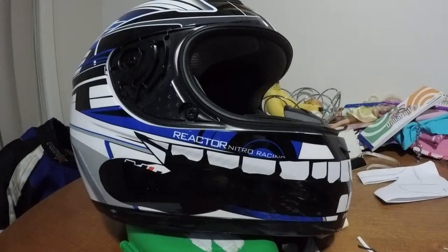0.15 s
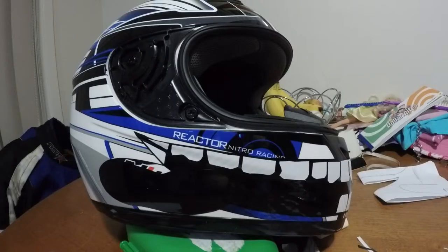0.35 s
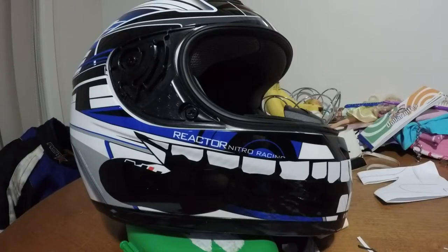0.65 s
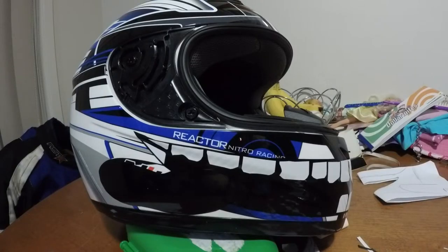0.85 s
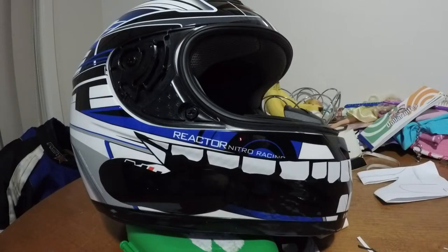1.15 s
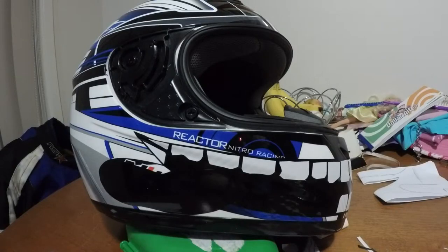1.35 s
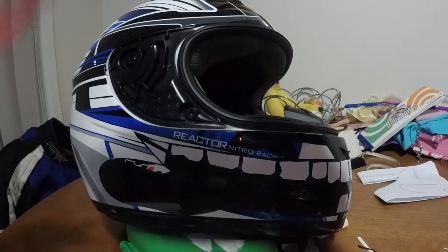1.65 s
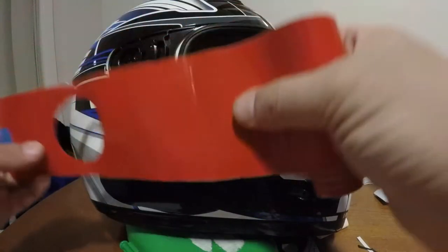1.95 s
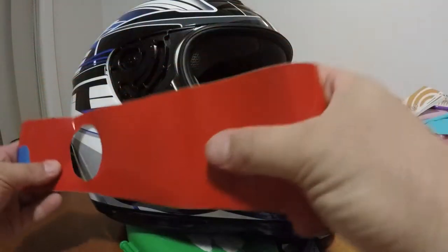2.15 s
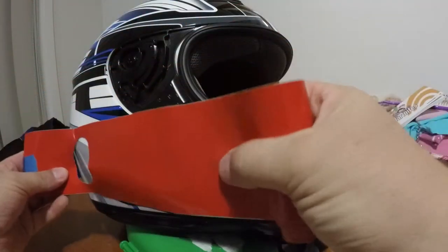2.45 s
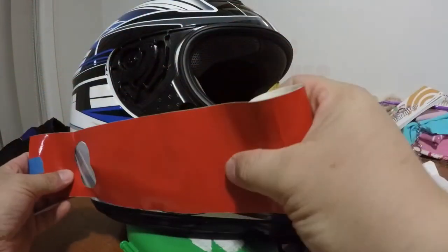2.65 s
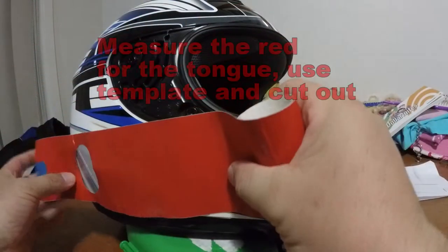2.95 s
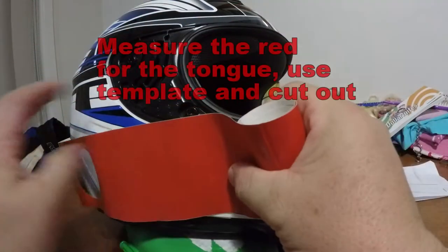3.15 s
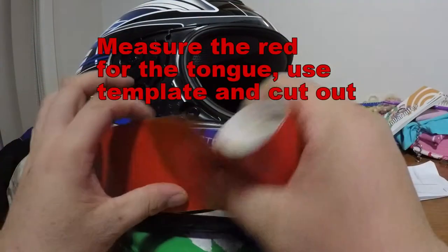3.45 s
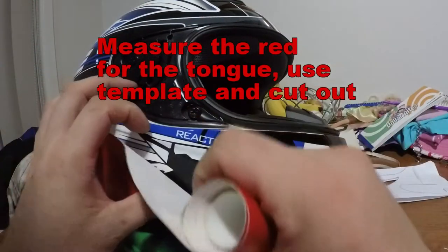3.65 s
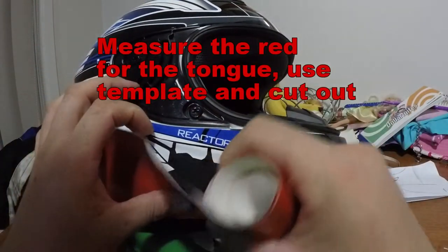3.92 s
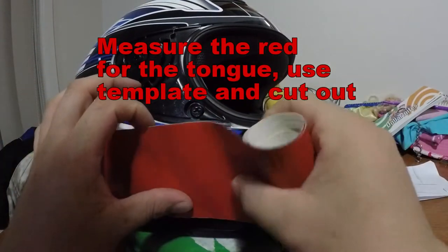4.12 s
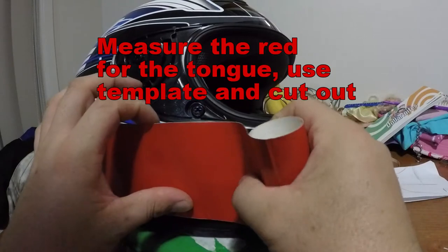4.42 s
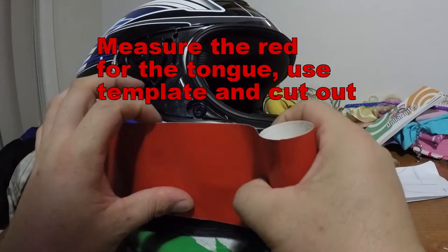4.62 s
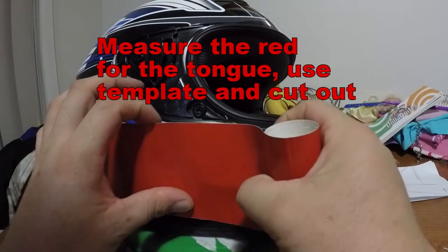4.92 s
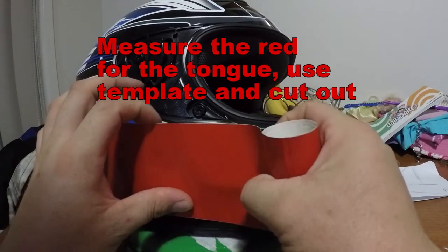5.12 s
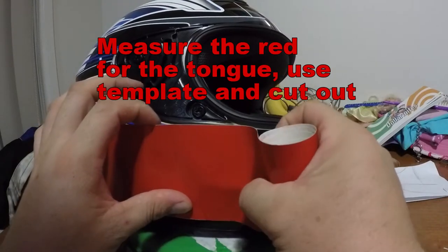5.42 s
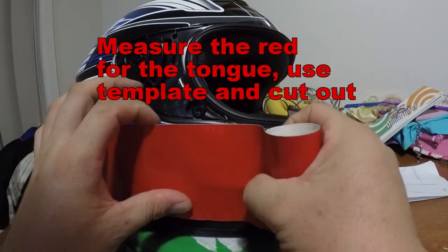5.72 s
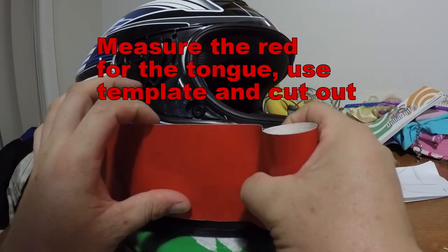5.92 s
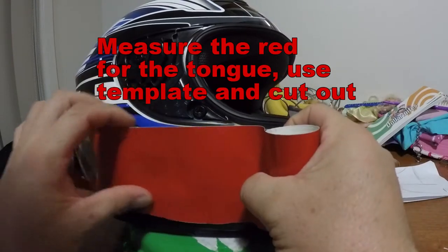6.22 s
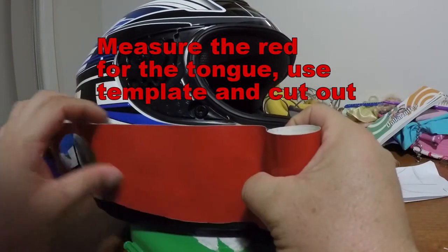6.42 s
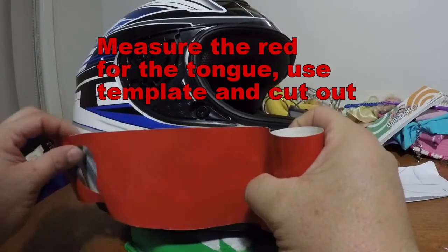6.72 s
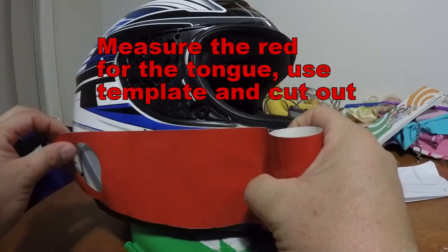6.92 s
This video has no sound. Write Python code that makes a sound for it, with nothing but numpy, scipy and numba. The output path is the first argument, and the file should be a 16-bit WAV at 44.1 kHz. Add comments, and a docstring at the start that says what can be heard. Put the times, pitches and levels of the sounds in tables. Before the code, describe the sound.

After a tiny silence, a quiet small room opens with low motor hum, slowly beating, plus soft hiss and lumpy rumble. Up to 0.5 s, film rubs dryly with small crinkles and a dull bump. A near pause follows until about 1.2 s, when light taps and scratchy strokes resume. From 1.65 to 2.6 s, creases snap over soft thuds, with a brighter pop near 2.35. Around 2.95-3.4 s comes a denser cluster of sharp crackles, rubs and hollow bumps. At 3.65 s one hard hollow knock is by far the loudest event, followed by a rapid papery flutter of about a tenth of a second. Then it is sparse, with soft bumps at 4.45. Crisp snaps come at 5.58 and 6.0; faint squeaky rubbing leads to a strong double snap at 6.6, then small crinkles and rubs fade toward 7 s. Close microphone, short dull room tail.

```python
"""In a small furnished room, two hands unroll a strip of adhesive vinyl and press it against a helmet.
Skin and film rub in short strokes made of random slips, and creases snap as brief filtered bursts.
The roll bumps the shell with soft pushes that ring its modes, and knocks it hard once.
Three motors elsewhere in the house hum as sums of cosines at nearly the same speed and beat slowly.
Shaped noise lays a hiss and a lumpy rumble underneath."""
import sys
import numpy as np
from scipy import signal
from scipy.fft import rfft, irfft
from scipy.io import wavfile
from scipy.ndimage import uniform_filter1d
from numba import njit

SR = 44100
rng = np.random.default_rng(int(sys.argv[2]) if len(sys.argv) > 2 else 0)


def materialize(psi):
    """Save the field psi as 16-bit PCM at rate SR to the path in sys.argv[1].

    A 1-D psi becomes a single channel; in a 2-D psi each row is a channel.
    """
    bounded = np.clip(np.atleast_2d(psi).T, -1, 1)
    quanta = np.round(bounded * 32767).astype(np.int16)
    wavfile.write(sys.argv[1], SR, quanta)


N = 311787
T = np.arange(N) / SR

# spectrum of the hiss: pitch_hz, relative level_db
HISS_SPECTRUM = [(22, 21), (32, 25), (45, 18.5), (70, 13), (120, 8.5), (200, 3), (350, -2), (550, -13.5),
                 (750, -22), (1400, -26), (2600, -21), (4500, -18), (7500, -21.5), (15000, -25)]
HISS_DB = -52  # rms
# narrow bands in the hiss: centre_hz, width_hz, rms_db
WHISTLES = [(2620, 45, -82), (5930, 66, -78.5)]
# mains hum: pitch_hz, rms_db
MAINS = (100.03, -72)
# motors: speed_hz, crest_s (when a crest passes), [(multiple of the speed, rms_db before drift)]
MOTORS = [(48.848, .0056, [(1, -43.6), (2, -74)]), (51.453, .0141, [(1, -49.4)]),
          (49.254, .0113, [(1, -54.6), (3, -58.5), (7, -74), (10, -79), (38, -86), (39, -73.5), (44, -83)])]
# buzz of the first motor: multiple of its speed, rms_db before swells
BUZZ = [(3, -74), (4, -75), (8, -78), (9, -78), (11, -79), (12, -81), (14, -84), (17, -85), (19, -82),
        (21, -87), (24, -82), (25, -84), (27, -84), (28, -85), (29, -81), (30, -84), (31, -85), (32, -86),
        (41, -84), (42, -87), (45, -87), (46, -86), (48, -87), (49, -83), (51, -86), (53, -83), (54, -85),
        (55, -87)]
# upper whine of the third motor: time_s, 40th_multiple_rms_db, 41st_multiple_rms_db
WHINE = [(.3, -76, -84), (1.3, -79, -90), (2.3, -84, -75), (2.8, -84, -77), (3.1, -76, -76),
         (3.75, -69, -78), (4.1, -71, -75), (4.6, -78, -75), (7.07, -79, -77)]
# rumble of air and table: time_s, level_db, deep_part_db (before swells)
RUMBLE = [(0.1, -61.5, -66), (0.5, -63.5, -71), (1.1, -66.5, -79), (1.6, -65, -59), (2.3, -60.5, -57.5),
          (2.8, -66, -79), (3.4, -63, -58.5), (4.0, -63, -70), (4.8, -68.5, -64), (5.5, -64.5, -67),
          (6.1, -62.5, -64), (7.07, -67.5, -58)]
DEEP_SWELL_DB, DEEP_SWELLS_PER_S = 1.2, 3

# modes of the helmet shell: pitch_hz, width_hz, level_db
SHELL_MODES = [(334, 27, 5), (556, 100, -1), (779, 46, 0.5), (852, 14, 2.5), (1370, 28, -35)]
# roll and fingers bumping the shell: start_s, peak_db, pitch_hz, scuff_t60_s (at least 0.01 is used),
# upper_scuff_db and shell_ring_db (upper scuff against the bump, ring against the thud's body)
BUMPS = [(0.156, -56.5, 412, 0.13, 9, -3), (0.445, -42, 705, 0.25, -17, -1),
         (1.255, -44.5, 493, 0.07, -8, -5), (1.269, -43.5, 890, 0.05, -6, -5),
         (1.672, -42, 277, 0.055, -9, -4), (1.7223, -34.5, 1180, 0.019, -17, -12),
         (1.726, -36.5, 320, 0.046, -23, -8), (1.767, -47, 950, 0.03, -11, -10),
         (1.81, -52, 1150, 0.03, -15, -17), (1.828, -47, 1280, 0.03, -20, -20),
         (1.976, -50, 500, 0.03, -15, -10), (2.212, -49, 500, 0.03, -10, -10),
         (2.363, -53, 316, 0.059, -7, -3), (2.367, -43, 1200, 0.03, -12, -15),
         (2.571, -44.5, 202, 0.044, -25, -1), (2.989, -43.5, 890, 0.04, -25, 2),
         (3.005, -45, 253, 0.033, 1, -6), (3.006, -44, 800, 0.03, -15, -6),
         (3.1, -42.5, 265, 0.083, -2.5, -6), (3.279, -36, 495, 0.31, -20, -4),
         (3.287, -38, 630, 0.092, -23, -8), (3.295, -42, 520, 0.1, -22, -5),
         (3.308, -45, 350, 0.1, -15, -3), (3.545, -46, 1000, 0.02, -10, -15),
         (3.547, -35, 298, 0.03, -12, -7), (3.555, -46, 850, 0.03, -15, -12),
         (3.567, -47, 500, 0.03, -12, -10), (3.606, -40.5, 475, 0.03, -11, -12),
         (3.61, -44, 1010, 0.04, -20, -17), (3.612, -34, 295, 0.039, -20, -10),
         (3.654, -43, 830, 0.043, -15, -2), (4.44, -46, 400, 0.08, -3, -8),
         (4.453, -42, 270, 0.17, -9, -10), (4.465, -47.5, 330, 0.087, -7, -6),
         (5.579, -39, 293, 0.089, -10, -5), (6.008, -35.5, 290, 0.024, -16, -4),
         (6.082, -46, 520, 0.03, -20, -12), (6.085, -49, 1000, 0.03, -20, -16),
         (6.092, -40.5, 272, 0.097, -30, -7), (6.132, -50, 280, 0.04, -20, -8),
         (6.426, -42, 900, 0.03, -5, 1), (6.436, -54, 880, 0.04, -20, -5),
         (6.604, -41, 300, 0.069, -12, -3), (6.654, -44.5, 242, 0.064, -4, -3),
         (6.893, -53.5, 300, 0.05, 5, -3), (6.904, -54.5, 250, 0.06, 2, -6)]
# the roll hits the shell hard once: peak_db, centre_hz, shell_ring_db, crack_db (both against the peak)
KNOCK = (-16.5, 1419, -6, -11.5)
KNOCK_S = 3.6445
# resonances of the hollow roll: pitch_hz, base width_hz (widened in use), level_db
ROLL_MODES = [(2390, 220, 5), (2900, 360, 1), (3400, 260, 0), (4190, 530, 1), (5100, 610, -4)]

# creases snapping: start_s, peak_db, centre_hz, body_db, airy_db (both against the peak)
SNAPS = [(0.157, -37.5, 2400, -8, -10), (0.225, -42, 4000, -20, -15), (0.255, -44, 2600, -1.5, -15),
         (1.219, -39, 3630, -8, -22), (1.477, -38, 3200, -9.5, -3), (1.494, -42, 5100, -7, -21),
         (1.6701, -32, 4300, -6, -27), (1.6726, -32, 3640, -9, 0.5), (2.007, -47, 3800, -20, -20),
         (2.031, -36.5, 4350, -14, -28), (2.0757, -47, 3200, 1.5, -20), (2.081, -42, 2600, -9, -7),
         (2.1743, -32.5, 3420, -11, -11), (2.211, -43, 3000, -7, -18), (2.242, -43, 4200, -8, -20),
         (2.356, -28.5, 3700, -12, -12), (2.4305, -38, 2300, -3, -25), (2.575, -45, 3130, -19, -27),
         (2.9539, -30, 5500, -14, -15), (2.9575, -38, 6100, -14, -20), (2.9916, -40, 5600, -19, -1),
         (3.004, -31, 4170, -13, -25), (3.006, -36, 2420, -20, -30), (3.068, -39.5, 3600, -11, -18),
         (3.085, -38, 2970, -26, -29), (3.103, -25.5, 4400, -32, -17), (3.108, -36, 3470, -11, -36),
         (3.114, -34.5, 3300, -26, -29), (3.172, -46, 5200, -25, -20), (3.2782, -38, 2300, -20, -22),
         (3.3514, -39, 3500, -21, -28), (3.367, -41, 3200, -24, -31), (3.468, -47, 3700, -25, -28),
         (3.513, -41.5, 2900, -8, -25), (3.5454, -58, 2280, 16.5, -25), (3.654, -38, 3050, 4, -50),
         (3.663, -41, 2200, -5, -40), (3.95, -48, 5300, -27, -19), (3.995, -49, 3600, -18, -20),
         (4.138, -47, 3330, -18, -24), (4.41, -39.5, 2600, -5, -39), (4.569, -47.5, 2410, -6, 2),
         (5.5554, -42, 3330, -9, -19), (5.5806, -24.5, 4140, -11.5, -13), (5.792, -39.5, 3370, -9, -30),
         (6.0057, -25, 3220, -9.5, -21), (6.1917, -42, 2820, -11, -24), (6.253, -46, 2900, -9, -28),
         (6.567, -47, 2500, -8, -10), (6.581, -43, 2600, -8, -8), (6.6033, -28, 3230, -11, -32),
         (6.6067, -21, 3080, -16, -7), (6.655, -46, 3200, -6, -24), (6.672, -43, 3400, -15, -10),
         (6.743, -45, 3300, -2, -10), (6.757, -43, 3000, -19, -29), (6.905, -39.5, 2260, -14, -23)]
# rings of a crease: share of its centre pitch, level_db
CREASE_RINGS = [(.6, -25), (.85, 6.5), (1.16, -14), (1.55, -12)]
CREASE_BODY_HZ = 1390
CRACKLE_DB = -24  # rms before its fade and the crease filters
# resonances of the loose end flapping against the shell: pitch_hz, width_hz, level_db
LOOSE_END = [(830, 120, -3), (990, 160, 2), (1300, 250, -6), (1530, 200, -1), (1950, 110, -6),
             (2560, 150, -9), (3300, 180, -16), (4190, 250, -16)]
FLAP_S, FLAP_PERIOD_S = 3.6755, .0204
FLAP_DB, FLAP_FADE_DB = -24, 0.6  # peak of the first slap before the resonances, drop per flap
RATTLE_DB, RATTLE_END_S = -32, 0.15  # loose film before the resonances; its end after the knock

# skin and film creeping: time_s, level_db, centre_hz, dull_part_db, airy_db (against the level)
CREEP = [(0.1, -77, 3180, -59, -13), (0.24, -60, 3550, -64.5, -1), (0.42, -79, 3420, -65, -19),
         (0.69, -69.5, 3820, -65.5, 0.5), (1.1, -81, 3000, -69, -8), (1.26, -69.5, 4100, -60, 0),
         (1.7, -71, 3870, -65.5, 3.5), (1.82, -65, 3600, -58, 1), (2.0, -69, 3700, -65.5, 2),
         (2.25, -65.5, 3230, -61, -1), (2.75, -72.5, 3160, -68, -6), (3.0, -63, 3560, -62, 0),
         (3.2, -76, 3150, -68, -8), (3.32, -61.5, 2980, -65.5, -6), (3.6, -81, 2900, -66, -18),
         (4.43, -70.5, 3530, -67, -5), (5.0, -87, 3080, -67, -10), (5.2, -68, 3000, -67, -4),
         (5.9, -84, 3400, -67, -13), (6.2, -61, 3340, -70, -8), (6.46, -64.5, 4600, -64, -5),
         (6.57, -63.5, 3040, -62, 0.5), (6.85, -63, 2860, -63.5, -6), (7.07, -75, 3050, -68, -8)]
TICKS_PER_S, TICK_DB = 45, -15  # small creases, against the creep level
# strokes: start_s, end_s, level_db, change_to_end_db, centre_hz, airy_db, squeak_db (both against the level)
STROKES = [(0.047, 0.166, -65, 5, 3670, 2, -31), (0.151, 0.207, -59, -1, 2970, -10, 3.5),
           (0.151, 0.268, -57, -6, 3860, -0.5, -11), (1.223, 1.406, -60, 1, 4300, -2, -23),
           (1.478, 1.55, -61.5, -9, 4930, 11, -23), (1.486, 1.512, -61, 0, 5470, -20, 3),
           (1.589, 1.626, -61, 0, 4030, 3, -28), (1.657, 1.703, -59, -4, 4500, -1, -15),
           (1.738, 1.762, -61, -0.5, 5400, -9, -5), (2.054, 2.096, -60, 1, 3940, -4, -24),
           (2.277, 2.328, -62, -1, 2900, -15, -17), (2.365, 2.428, -64, 2, 3900, -12, -15),
           (2.462, 2.583, -56, -3.5, 2900, -20, -9), (2.937, 2.957, -59, 0, 6000, -10, -15),
           (2.949, 2.965, -55, -2, 3400, -8, 1), (2.987, 3, -53, 0, 5200, -12, -2),
           (3.006, 3.021, -52.5, -2, 3450, -20, 0), (3.029, 3.048, -65, -3, 3400, -20, 6),
           (3.275, 3.357, -55.5, -12, 3100, -16, -6), (3.362, 3.39, -60.5, -9, 2900, -22, 4),
           (3.435, 3.483, -69.5, 5, 2930, -22, -1.5), (3.943, 3.963, -64, 8.5, 5330, -15, -3),
           (4.13, 4.244, -68, -4, 2960, -14, -11), (4.437, 4.469, -58.5, 1, 3120, -4.5, -21),
           (4.553, 4.638, -70, 6, 3700, -12, -18), (5.453, 5.56, -86, -11, 3830, -16, -20),
           (5.579, 5.632, -54, -19, 5000, 3, -17), (6.198, 6.254, -61, -5, 4360, -8, -20),
           (6.248, 6.37, -67.5, -2, 2900, -19, 6), (6.377, 6.476, -70, 4, 5960, -20, -5),
           (6.471, 6.53, -64.5, 6, 5100, -20, -2), (6.529, 6.535, -54, 0, 4030, -25, 14),
           (6.609, 6.645, -56, -9, 4000, -6, -15), (6.644, 6.68, -51, 0, 2900, -7, -8),
           (6.668, 6.69, -57, -2, 2460, -3, 1), (6.673, 6.698, -63.5, -3, 6000, -20, 3),
           (6.813, 6.852, -59.5, -5, 3140, -18, -10), (6.875, 6.924, -58.5, -5, 3400, -5, -20)]
STROKE_EDGE_S = 0.006

ROOM_T60_S, ROOM_DB, ROOM_WIDTH_HZ = 0.33, -18.5, 3700
START_S, TOP_HZ = .052, 15600


def undb(db):
    """Decibels to an amplitude factor."""
    return 10 ** (np.asarray(db) / 20)


def level(x, db):
    """Sets the rms level."""
    return x * undb(db) / np.sqrt(np.mean(x ** 2))


def peak(x, db):
    """Sets the peak level."""
    return x * undb(db) / np.max(np.abs(x))


def tone(turns):
    """Cosine of unit rms, its phase counted in turns."""
    return np.sqrt(2) * np.cos(2 * np.pi * turns)


@njit
def svf(x, hz, width):
    """State-variable band-pass whose centre and width may move; gain 1 at the centre."""
    y, b, l = np.empty(len(x)), 0., 0.
    for i in range(len(x)):
        g, k = np.tan(np.pi * hz[i] / SR), width[i] / hz[i]
        v = (b + g * (x[i] - l)) / (1 + g * (g + k))
        b, l, y[i] = 2 * v - b, l + 2 * g * v, k * v
    return y


def band(x, hz, width):
    """Band-pass with fixed or moving settings."""
    one = np.ones(len(x))
    return svf(x + 1e-18, np.clip(hz * one, 20, SR * .45), width * one)


def steep(x, hz, width):
    """The same band-pass twice, for steeper sides."""
    return band(band(x, hz, width), hz, width)


def walk(rate):
    """Random levels held 1 / rate s and slewed twice; spread near 1."""
    hold = int(SR / rate)
    steps = np.repeat(rng.standard_normal(N // hold + 1), hold)
    return 1.35 * uniform_filter1d(uniform_filter1d(steps, hold), hold)[:N]


def slips(size, rate, spread_db):
    """Stick-slip ticks at random moments, of random sign and size; spread_db scatters the sizes further."""
    ticks = rng.random(size) < rate / SR
    return ticks * rng.standard_normal(size) * undb(spread_db * rng.exponential(size=size))


def add(out, s, x):
    """Mixes x into out from time s."""
    i = int(s * SR)
    out[i:i + len(x)] += x[:N - i]


def hiss():
    """Smooth noise of house and microphone, with a few narrow flickering bands."""
    hz, db = np.transpose(HISS_SPECTRUM)
    f = np.maximum(np.arange(N // 2 + 1) * SR / N, 1)
    shape = undb(np.interp(np.log(f), np.log(hz), db)) * (f > 18)
    out = level(irfft(rfft(rng.standard_normal(N)) * shape, N), HISS_DB)
    for centre_hz, width, rms_db in WHISTLES:
        whistle = band(rng.standard_normal(N), centre_hz, width)
        out += level(whistle * undb(2.8 * walk(15)), rms_db)
    return out


def motors():
    """Each motor sounds multiples of its speed, drifting in level; close speeds beat over a mains hum."""
    mains_hz, mains_db = MAINS
    out = undb(mains_db) * tone(mains_hz * T)
    for hz, crest_s, multiples in MOTORS:
        for k, db in multiples:
            # even multiples lag a quarter cycle
            turns = k * hz * (T - crest_s) - (k % 2 == 0) / 4
            out += undb(db + .7 * walk(6)) * tone(turns)
    return out


def buzz():
    """High multiples of the first motor, unrelated in phase, each swelling slowly."""
    out = np.zeros(N)
    speed_hz = MOTORS[0][0]
    for k, db in BUZZ:
        swell_db = np.interp(T, np.arange(9), 2 * rng.standard_normal(9))  # a new target each second
        out += undb(db + swell_db) * tone(k * speed_hz * T + rng.random())
    return out


def whine():
    """Two neighbouring multiples of the third motor wax and wane; the lower lags a quarter cycle."""
    s, lower_db, upper_db = np.transpose(WHINE)
    speed_hz, crest_s, _ = MOTORS[2]
    turns = speed_hz * (T - crest_s)
    lower = undb(np.interp(T, s, lower_db)) * tone(40 * turns - 1 / 4)
    upper = undb(np.interp(T, s, upper_db)) * tone(41 * turns)
    return lower + upper


def rumble():
    """Low, lumpy noise of air and table; its deep part swells at random."""
    lumps = rng.standard_normal(N) * undb(2.0 * walk(25))
    s, db, deep_db = np.transpose(RUMBLE)
    deep_db = np.interp(T, s, deep_db) + DEEP_SWELL_DB * walk(DEEP_SWELLS_PER_S)
    low = undb(np.interp(T, s, db)) * level(steep(lumps, 180, 480), 0)
    return low + undb(deep_db) * level(steep(lumps, 57, 138), 0)


def room(x):
    """Near walls answer after a few milliseconds with a short, dull tail."""
    t = T[:SR // 2]
    decay = 1000 ** (-t / ROOM_T60_S) * (t > .008)
    tail = band(rng.standard_normal(len(t)), 620, ROOM_WIDTH_HZ) * decay
    return x + signal.fftconvolve(x, tail * undb(ROOM_DB) / np.sqrt(np.sum(tail ** 2)))[:N]


def shell(push):
    """The helmet shell rings with its modes."""
    return sum(undb(db) * band(push, hz, width) for hz, width, db in SHELL_MODES)


def bump(db, hz, t60, upper_db, shell_db):
    """A soft push, half a cycle long, thuds at its own pitch, scuffs and rings the shell."""
    t = T[:SR // 5]
    push = np.sin(2 * np.pi * hz * np.minimum(t, .5 / hz))
    scuff = 0.86 * rng.standard_normal(len(t)) * 1000 ** (-t / max(t60, .01))
    body = band(steep(push + 0.59 * scuff, hz, 0.7 * hz), hz, hz)
    thud = peak(body, 0) + peak(shell(push + scuff), shell_db)
    return peak(thud, db) + peak(steep(scuff, 530, 870), db + upper_db)


def knock():
    """The one hard hit swings a full cycle, rings the shell and cracks through the hollow roll."""
    t = T[:SR // 5]
    db, hz, shell_db, crack_db = KNOCK
    push = np.sin(2 * np.pi * hz * np.minimum(t, 1 / hz))
    body = steep(push, hz, 2600) + 0.82 * band(push, hz, 420)
    burst = rng.standard_normal(len(t)) * np.exp(-t / 0.0016)
    burst[0] += 6  # sharp first contact
    crack = np.zeros(len(t))
    for mode_hz, width, mode_db in ROLL_MODES:
        crack += undb(mode_db) * steep(steep(burst, mode_hz, 1.5 * width), mode_hz, 2.7 * width)
    return peak(body, db) + peak(shell(push), db + shell_db) + peak(crack, db + crack_db)


def bumps():
    """Places the soft bumps and the hard knock."""
    out = np.zeros(N)
    for s, *how in BUMPS:
        add(out, s, bump(*how))
    add(out, KNOCK_S, knock())
    return out


def snap(db, hz, body_db, airy_db):
    """A crease gives way within a millisecond or two, rings a few cycles and leaves a fading crackle."""
    t = T[:SR // 8]
    flip = level(slips(len(t), rate=3400, spread_db=0.5), CRACKLE_DB) * np.exp(-t / 0.0091)
    flip += 0.44 * rng.standard_normal(len(t)) * t / 0.00051 * np.exp(-t / 0.001)
    flip[SR // 2000] -= 3  # a click half a millisecond in
    ring = 1.56 * band(steep(flip, hz, 1.02 * hz), hz, 1.26 * hz)
    for share, ring_db in CREASE_RINGS:
        ring += undb(ring_db) * steep(flip, share * hz, 0.47 * hz)
    body = peak(steep(flip, CREASE_BODY_HZ, 670), db + body_db)
    return peak(ring, db) + body + peak(steep(flip, 8200, 8400), db + airy_db)


def flaps():
    """After the knock the loose end slaps the shell six times, ever softer, over a rustle of film."""
    slaps, rustle = np.zeros(N), np.zeros(N)
    for k in range(6):
        slap = rng.standard_normal(SR // 20) * np.exp(-T[:SR // 20] / .004)
        add(slaps, FLAP_S + k * FLAP_PERIOD_S, peak(slap, FLAP_DB - k * FLAP_FADE_DB))
    t = T[:SR // 4]
    fade = np.exp(-t / 0.04) * (t < RATTLE_END_S)
    add(rustle, KNOCK_S, undb(RATTLE_DB) * rng.standard_normal(len(t)) * fade)
    rings = sum(undb(db) * band(slaps + rustle, hz, width) for hz, width, db in LOOSE_END)
    return steep(rings, 1520, 3600) + 0.29 * steep(rustle, 2300, 2600)


def snaps():
    """Every snapping crease, and the run of flaps."""
    out = flaps()
    for s, *how in SNAPS:
        add(out, s, snap(*how))
    return out


def film(grit, hz, airy_db, squeak_db):
    """Slips excite the film: a broad hump, a squeak at its centre and an airy top."""
    hump = level(band(steep(grit, hz, 1.8 * hz), 0.69 * hz, 2.2 * hz), 0)
    squeak = level(steep(grit, hz, .11 * hz), squeak_db)
    return hump + squeak + undb(airy_db) * level(band(grit, 5750, 10400), 0)


def creep():
    """Skin and film creep in dense, uneven slips while the hands move, and small creases tick at random."""
    s, *columns = np.transpose(CREEP)
    db, hz, dull_db, airy_db = [np.interp(T, s, column) for column in columns]
    grit = slips(N, rate=8000, spread_db=-1.0) * undb(1.3 * walk(60))
    ticks = level(steep(slips(N, rate=TICKS_PER_S, spread_db=2.0), hz, hz), TICK_DB)
    dull = undb(dull_db) * level(steep(grit, 1244, 2800), 0)
    return undb(db) * (film(grit, hz, airy_db, -37.0) + ticks) + dull


def strokes():
    """Each distinct rub of the film starts and stops within a few milliseconds."""
    out = np.zeros(N)
    for start, end, db, change_db, hz, airy_db, squeak_db in STROKES:
        t = T[:int((end - start) * SR)]
        edges = np.clip(np.minimum(t, t[-1] - t) / STROKE_EDGE_S, 0, 1)
        pressure = edges * undb(db + change_db * t / t[-1])
        grit = slips(len(t), rate=14000, spread_db=1.5)
        add(out, start, pressure * film(grit, hz, airy_db, squeak_db))
    return out


def scene():
    """Hands and film in the room, over the house noise."""
    house = hiss() + motors() + buzz() + whine() + rumble()
    hands = bumps() + snaps() + creep() + strokes()
    return (house + room(hands))[None]


def record(dry):
    """The microphone opens after a short silence and the top is cut."""
    opened = dry * np.clip((T - START_S) / .004, 0, 1)
    return signal.sosfilt(signal.ellip(10, .2, 70, TOP_HZ, fs=SR, output="sos"), opened)


dry = scene()
out = record(dry)
materialize(out)
```